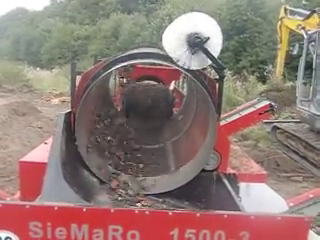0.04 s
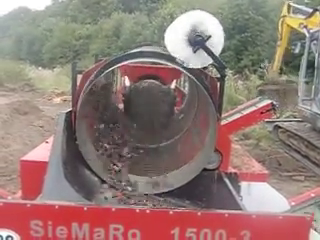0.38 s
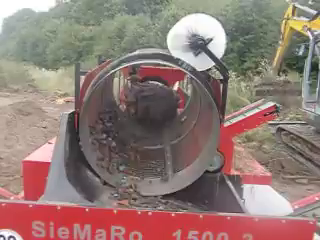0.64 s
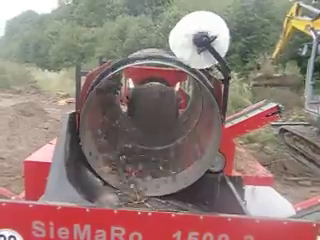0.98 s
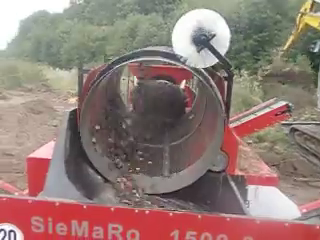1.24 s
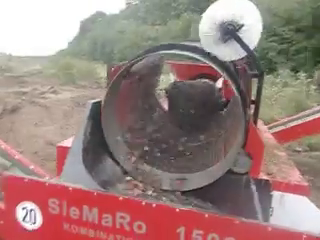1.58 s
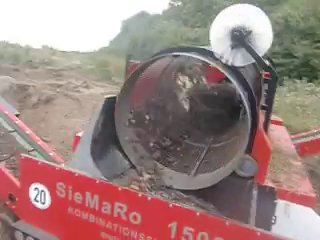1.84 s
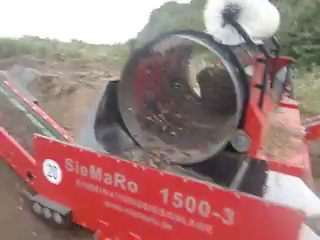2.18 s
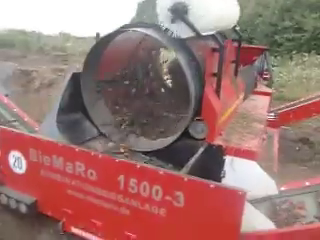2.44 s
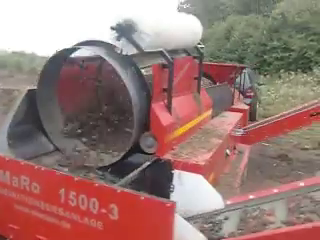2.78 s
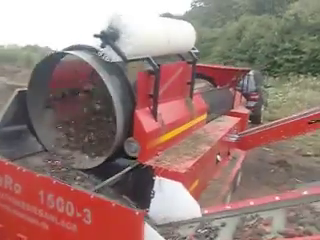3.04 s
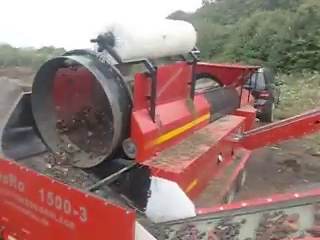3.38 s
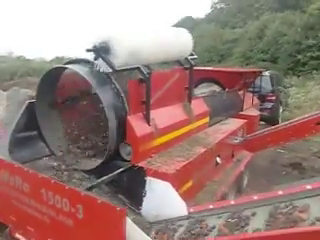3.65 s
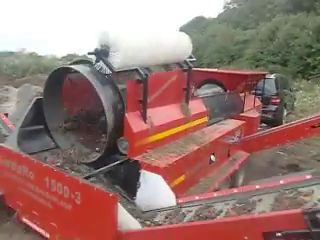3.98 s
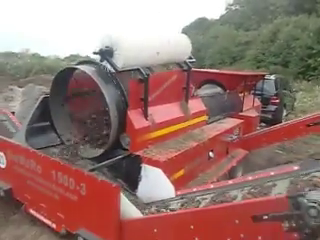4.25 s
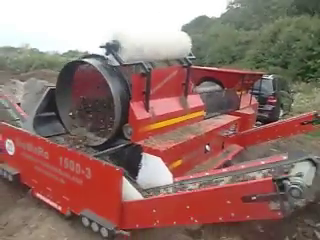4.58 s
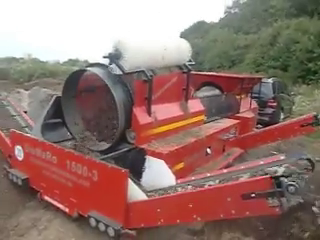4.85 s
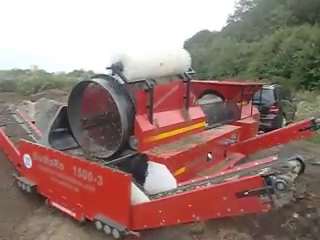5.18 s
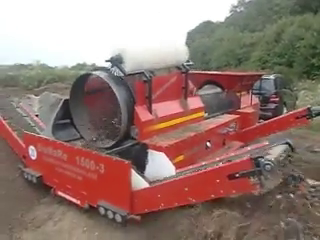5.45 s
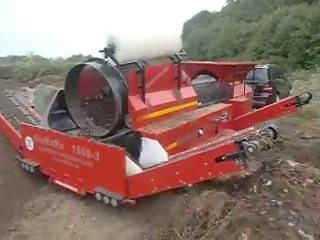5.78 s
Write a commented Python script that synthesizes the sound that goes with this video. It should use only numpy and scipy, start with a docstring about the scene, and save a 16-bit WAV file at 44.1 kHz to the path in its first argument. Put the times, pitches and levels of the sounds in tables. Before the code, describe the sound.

A screening machine runs outdoors with a steady engine drone, a rough rumble and a faint whine. Close to its turning steel drum, broken brick and concrete slide in regular surges, stones clicking together and ringing briefly on the shell. After about two seconds the tone shifts as the microphone moves to the side, and three heavy thumps follow while the drone grows fainter. The sound is narrow and compressed.

```python
"""A trommel screen sieves broken brick and concrete outdoors. At first the listener stands at the drum's
mouth, where the engine drones and the turning drum lifts rubble that slides back in surges: stones click
together and excite the modes of the steel shell. Near 2 s the listener walks round to the side and the
timbre shifts; then heavy blocks thump the frame three times as the drone grows fainter. Throughout, a
narrow-band recorder's gain control ducks the drone under each slide, and the hardest knocks overload it."""
import sys
import numpy as np
from scipy import signal
from scipy.fft import rfft, irfft
from scipy.io import wavfile

SR = 44100
rng = np.random.default_rng(int(sys.argv[2]) if len(sys.argv) > 2 else 0)


def dump(signal):
    """Clip the signal to [-1, 1] and save it as 16-bit WAV at the path in sys.argv[1]."""
    limited = np.clip(np.atleast_2d(signal).T, -1, 1)
    pcm = np.round(limited * 32767).astype(np.int16)
    wavfile.write(sys.argv[1], SR, pcm)


N = 265041
TIME = np.arange(N) / SR

# the listener's path: (time [s], share of the way from mouth to side [0-1])
WALK_PATH = [(0, 0.09), (1.7, 0.13), (2.5, 0.85), (3.8, 1), (6.01, 1)]
# rumble spectrum: (frequency [Hz], relative density at the mouth [dB], at the side [dB])
RUMBLE_SPECTRUM = [(20, -15, -9), (40, -10, -16.5), (60, -6, -4.5), (108, 1.5, -5.5), (169, 0, 1),
                   (257, 0.5, 0), (360, -1.3, -3.5), (480, -0.8, -1.3), (596, -1, -.5), (800, -3, -3),
                   (1200, -5.5, -3), (2500, -7, -10.5), (4720, -12.5, -6), (5980, -40.5, -37)]
# drone along the walk: (time [s], engine level [dB], drum drive level [dB], pump level [dB])
DRONE_LEVELS = [(0, -20, -33, -32.5), (1.2, -20.5, -34, -27.5), (1.9, -21, -32.5, -28.5),
                (2.5, -24, -35.5, -34), (3.7, -28, -36.5, -37), (4.7, -25, -31, -37.7),
                (6, -28.5, -33, -42.5)]
# machine speeds: (time [s], engine firing rate [Hz], hydraulic pump frequency [Hz])
SHAFT_SPEEDS = [(0, 92.35, 417.4), (1.2, 91.4, 407.6), (2.1, 91.3, 415), (2.6, 93.2, 417.3),
                (4.8, 92.4, 414.4), (5.2, 92.4, 411.3), (6.01, 91.5, 410)]
# engine partials: (order [multiple of the firing rate], relative level [dB])
ENGINE_ORDERS = [(.25, -37), (.5, -35.5), (1, 2.5), (1.75, -19.5), (2, -25.5), (2.25, -22), (2.5, -22.5),
                 (3, -28)]
# drum drive harmonics: (order [multiple of DRIVE_HZ], relative level [dB])
DRIVE_ORDERS = [(1, 0), (2, -5), (3, -11)]
# heavy blocks striking the frame: (time [s], level [dB])
FRAME_THUDS = [(2.33, -24), (3.374, -16), (5.33, -23.5)]
# steel shell modes: (frequency [Hz], t60 [s], relative level at the mouth [dB], at the side [dB])
SHELL_MODES = [(657, 0.034, -7, -13.5), (925, 0.037, -21, -10.5), (1055, 0.056, -14, -5),
               (1165, 0.025, -5.5, -6.5), (1438, 0.035, -19, -7.5), (1545, 0.069, -8, -3),
               (1664, 0.029, 0, 1), (1890, 0.033, -6.5, -4.5), (2082, 0.054, 3, -5), (2192, 0.016, 0, -8.5),
               (2430, 0.012, -11, -23.5), (2974, 0.054, -1, -9)]
# large lumps landing: (time [s], relative clack level [dB], lump frequency [Hz],
# relative level of the blow on the shell [dB], chatter duration [s])
LUMP_LANDINGS = [(0.0922, 10, 3460, 15, 0.006), (0.281, 9.0, 4570, 4, 0.0097),
                 (0.3107, 15.5, 4360, 8.5, 0.006), (0.3394, 6.5, 3070, 6, 0.0047),
                 (0.378, 15.5, 4490, 0, 0.0028), (0.4237, 11, 4200, 1.5, 0.003),
                 (0.659, 7, 3180, 3.5, 0.008), (0.8624, 4, 4100, 9.5, 0.015), (0.9413, 11, 2920, 0, 0.0062),
                 (0.98, 9, 3040, 12.5, 0.0063), (1.4082, 14, 4300, 4, 0.004), (1.4326, 12, 4260, 7, 0.0041),
                 (1.516, 10.5, 4100, 6, 0.008), (1.5904, 12.5, 4090, 10, 0.017),
                 (1.879, 10, 5000, 4, 0.0058), (1.9634, 2.5, 4500, 1.5, 0.012),
                 (2.0605, 13.5, 3280, 10, 0.006), (2.106, 16, 3300, 6, 0.0044),
                 (2.137, 13.5, 3140, 10, 0.004), (2.21, 12, 3460, 1, 0.0067),
                 (2.3444, 11.5, 3040, 9, 0.015), (2.4877, 15.5, 4110, 6.5, 0.0035),
                 (2.6314, 6.5, 4000, 1, 0.0028), (2.662, 15, 4120, 0.5, 0.0026),
                 (2.688, 13, 3450, -3, 0.0087), (2.715, 9, 4320, -1, 0.0049), (2.879, 4, 4050, 4.5, 0.0084),
                 (3.038, 14, 3540, -1, 0.012), (3.0564, 12.0, 4290, -3, 0.0045),
                 (3.1524, 6, 4470, 0, 0.013), (3.173, 13, 3730, 0.5, 0.013), (3.208, 17, 4580, 14, 0.011),
                 (3.44, 5, 3980, 8, 0.003), (3.576, 9.5, 4440, 4, 0.004), (3.6246, 16, 4050, 6, 0.006),
                 (3.6775, 14, 4140, 6, 0.0065), (3.7554, 11.5, 4400, 1, 0.0063),
                 (3.7803, 14, 4130, 5, 0.006), (3.8114, 20, 3590, 14, 0.026), (4.124, 11, 3750, 6.5, 0.005),
                 (4.2048, 8, 3850, -1, 0.011), (4.3226, 17.5, 3900, 10, 0.0044),
                 (4.4136, 13, 3810, 9.5, 0.005), (4.797, 11.5, 3980, 5, 0.0053),
                 (4.8314, 14.5, 4180, 13.5, 0.003), (4.8838, 10.5, 3120, -8, 0.012),
                 (4.9297, 8.5, 3780, 9.5, 0.0089), (4.9886, 16, 4480, 9.5, 0.015),
                 (5.176, 10.5, 4050, 7, 0.018), (5.3624, 5, 3420, 17, 0.0093),
                 (5.4605, 13.5, 3840, 1, 0.003), (5.5116, 18.5, 3290, 0, 0.012),
                 (5.55, 6.5, 4010, 11, 0.0049), (5.976, 15.0, 3850, 10, 0.0084)]
# colour of the clatter: (frequency [Hz], relative gain at the mouth [dB], at the side [dB])
CLATTER_SPECTRUM = [(300, -20, -25.5), (900, -23, -12.5), (1800, -14.5, -4), (2700, -3, -8),
                    (3090, -1.5, -2.5), (3600, -5, 1.5), (4220, 1, 3), (4500, 1, 0), (5010, -3, -3),
                    (5600, -12, -11.5), (6600, -15.5, -16.5)]
# slides of the load, about 0.57 s apart: (start [s], duration [s], clatter level [dB], steel level [dB])
LOAD_SLIDES = [(0.206, 0.21, -14.5, -18.8), (0.704, 0.3, -13.6, -19), (1.203, 0.35, -14, -21.5),
               (1.799, 0.346, -16.5, -20), (2.195, 0.552, -17, -21), (2.864, 0.43, -17, -19.5),
               (3.345, 0.54, -17, -20), (4.086, 0.342, -18, -22.5), (4.63, 0.361, -17, -22),
               (5.25, 0.31, -17.5, -18), (5.8, .33, -20, -29)]

DRIVE_HZ = 70.1
RUMBLE_DB = (-19.8, -22)  # mouth, side
ROLLING_CLATTER_DB, ROLLING_STEEL_DB = (-19.5, -22), (-21, -24)  # mouth, side
THUD_BAND_HZ, THUD_ATTACK_S, THUD_T60_S = (200, 1600), 0.0045, .45
SLIDE_BUILD_S, CLATTER_SETTLE_S, STEEL_SETTLE_S = .17, .045, 0.075
AGC_THRESHOLD_DB, AGC_RATIO = -19.5, 2.19
AGC_ATTACK_S, AGC_GLIDE_S, AGC_RECOVERY_DB_PER_S = 0.028, 0.035, 27.5
MIC_EDGE_HZ, OUTPUT_EDGE_HZ = 5920, 15800


def gain_of(db):
    """The decibel scale: 20 dB is a factor of ten in amplitude."""
    return 10 ** (np.asarray(db) / 20)


def unit_rms(x):
    """Normalisation to unit mean power."""
    return x / np.sqrt(np.mean(x ** 2) + 1e-20)


def curves(rows):
    """Linear interpolation of each column of a time table at every sample."""
    times, *columns = np.transpose(rows)
    return [np.interp(TIME, times, column) for column in columns]


def wander(rate_hz):
    """Random modulation: noise of unit rms, low-passed at the given rate."""
    f = np.fft.rfftfreq(N, 1 / SR)
    return unit_rms(irfft(rfft(rng.standard_normal(N)) / (1 + (f / rate_hz) ** 4), N))


def add(mix, start_s, sound):
    """Superposition of a sound on the mix from a given time."""
    part = mix[max(round(start_s * SR), 0):][:len(sound)]
    part += sound[:len(part)]


def walked(mouth, side):
    """Directivity: the sound at the mouth crossfades to that at the side along the walk."""
    share = np.clip(curves(WALK_PATH)[0], 0, 1)
    return (1 - share) * mouth + share * side


def coloured(x, spectrum):
    """Spectral shaping: mouth and side filters give signals of equal power, blended along the walk."""
    hz, *views_db = np.transpose(spectrum)
    log_f = np.log(np.fft.rfftfreq(N, 1 / SR) + 1)
    responses = [gain_of(np.interp(log_f, np.log(hz), db)) for db in views_db]
    return walked(*[unit_rms(irfft(rfft(x) * response, N)) for response in responses])


def rumble():
    """Broadband noise: fan, belts and shaking frame make a slightly uneven roar."""
    roar = coloured(rng.standard_normal(N), RUMBLE_SPECTRUM)
    return roar * gain_of(walked(*RUMBLE_DB) + .5 * wander(6.9))


def hum(hz, orders, shake):
    """Shaft orders: partials at fixed multiples of one rate, each fluctuating in amplitude."""
    turns = np.cumsum(hz) / SR
    sound = np.zeros(N)
    for order, db in orders:
        amplitude = gain_of(db) * (1 + shake * wander(11))
        sound += amplitude * np.sin(2 * np.pi * (order * turns + rng.random()))
    return unit_rms(sound)


def machine():
    """Periodic forcing: engine and drum drive beat together under the hydraulic pump's whine."""
    engine_db, drive_db, pump_db = curves(DRONE_LEVELS)
    firing_hz, pump_hz = curves(SHAFT_SPEEDS)
    engine = gain_of(engine_db) * hum(firing_hz, ENGINE_ORDERS, shake=0.1)
    drive = gain_of(drive_db) * hum(DRIVE_HZ * (1 + 0.0043 * wander(2.6)), DRIVE_ORDERS, shake=0.1)
    pump = gain_of(pump_db) * hum(pump_hz * (1 + 0.0027 * wander(13.0)), [(1, 0)], shake=0.38)
    return engine + drive + pump


def thuds():
    """Modal overlap: a heavy block excites so many low frame modes that they decay as a band of noise."""
    t = np.arange(SR // 2) / SR
    band = signal.butter(2, THUD_BAND_HZ, "bandpass", fs=SR, output="sos")
    envelope = np.minimum(t / THUD_ATTACK_S, 1) * gain_of(-60 * t / THUD_T60_S)
    sound = np.zeros(N)
    for start_s, db in FRAME_THUDS:
        vibration = unit_rms(signal.sosfilt(band, rng.standard_normal(len(t))))
        add(sound, start_s, gain_of(db) * envelope * vibration)
    return sound


def shell(blows, panels=4):
    """Modal resonance: each blow rings one of the drum's steel panels, all tuned slightly apart."""
    t = np.arange(4000) / SR
    hz, t60, mouth_db, side_db = np.transpose(SHELL_MODES)[:, :, None]
    struck_panel = rng.integers(0, panels, N)
    sound = np.zeros(N)
    for panel, detune in enumerate(np.linspace(-0.005, 0.005, panels)):
        modes = np.sin(2 * np.pi * (hz * (1 + detune) * t + rng.random(hz.shape)))
        modes *= gain_of(-60 * t / t60) / np.sqrt(t60)  # equal energy before weighting
        rings = [(gain_of(db) * modes).sum(0) for db in (mouth_db, side_db)]
        force = blows * (struck_panel == panel)
        sound += walked(*[signal.oaconvolve(force, ring / np.linalg.norm(ring))[:N] for ring in rings])
    return sound


def in_drum(x, wet_db, t60):
    """Reverberation: sparse, quick reflections in the drum, different for each landing place."""
    t = np.arange(6000) / SR
    arrivals = (rng.random(len(t)) < .08) * (t > .0015)
    taps = rng.standard_normal(len(t)) * arrivals * gain_of(-60 * t / t60)
    taps *= gain_of(wet_db) / np.linalg.norm(taps)
    taps[0] = 1  # direct sound
    return signal.fftconvolve(x, taps)


def stone(hz, t60, crack_db, overtone_db):
    """Impulse response of a stone: a brief crack and five damped, inharmonic modes."""
    t = np.arange(3000) / SR
    other_hz = hz * rng.uniform(0.707, 1.35, (4, 1))
    other_modes = np.sin(2 * np.pi * other_hz * t).sum(0)
    ring = np.sin(2 * np.pi * hz * t) + gain_of(overtone_db) * other_modes
    crack = rng.standard_normal(len(t)) * np.exp(-t / 0.0013)
    return ring * gain_of(-60 * t / t60) + gain_of(crack_db) * crack


def chatter(length_s, per_s):
    """Repeated contact: a rough lump lands hard, then rattles briefly on its corners."""
    t = np.arange(1500) / SR
    contacts = 0.48 * rng.standard_normal(len(t)) * (rng.random(len(t)) < per_s / SR)
    contacts *= np.exp(-(t / length_s) ** 4)
    contacts[0] = 1
    return contacts


def lumps():
    """Impact excites both bodies: each large lump clacks and sets the shell ringing."""
    clacks, blows = np.zeros(N), np.zeros(N)
    stone_band = signal.butter(5, [2300, 4950], "bandpass", fs=SR, output="sos")
    for start_s, clack_db, hz, blow_db, chatter_s in LUMP_LANDINGS:
        response = stone(hz, t60=0.013, crack_db=8.5, overtone_db=-7)
        rattle = signal.fftconvolve(response, chatter(chatter_s, per_s=2000))
        clack = signal.sosfilt(stone_band, in_drum(rattle, wet_db=-1.5, t60=0.089))
        add(clacks, start_s, gain_of(clack_db) * clack / np.linalg.norm(clack))
        add(blows, start_s, gain_of([blow_db]))
    return gain_of(3.0) * clacks + gain_of(0.5) * shell(blows)


def impacts(per_s, spread_db):
    """A Poisson process: independent collisions, many small and a few large."""
    size = gain_of(spread_db * np.minimum(rng.exponential(1, N), 4))
    return size * rng.choice([-1, 1], N) * (rng.random(N) < per_s / SR)


def sliding():
    """Incoherent sources add in power: clatter and steel envelopes of slides over steady rolling."""
    clatter_power = gain_of(walked(*ROLLING_CLATTER_DB)) ** 2
    steel_power = gain_of(walked(*ROLLING_STEEL_DB)) ** 2
    for start_s, length_s, clatter_db, steel_db in LOAD_SLIDES:
        flow = np.clip((TIME - start_s) / SLIDE_BUILD_S, 0, 1)
        since_end = TIME - start_s - length_s
        clatter_power += (gain_of(clatter_db) * flow * np.clip(1 - since_end / CLATTER_SETTLE_S, 0, 1)) ** 2
        steel_power += (gain_of(steel_db) * flow * np.clip(1 - since_end / STEEL_SETTLE_S, 0, 1)) ** 2
    return np.sqrt(clatter_power), np.sqrt(steel_power)


def rubble(sizes=40):
    """Granular flow: stones of many sizes tumble in clumps, striking each other and the shell."""
    clatter_gain, steel_gain = sliding()
    clumps = wander(16)
    clicks = np.zeros(N)
    for hz in np.linspace(2000, 5600, sizes):
        response = stone(hz, t60=0.013, crack_db=4, overtone_db=-7.5)
        click = in_drum(response, wet_db=-2.5, t60=0.052)
        clicks += signal.oaconvolve(impacts(per_s=38, spread_db=2.5), click / np.linalg.norm(click))[:N]
    clatter = clatter_gain * coloured(clicks, CLATTER_SPECTRUM)
    steel = steel_gain * unit_rms(shell(impacts(per_s=2000, spread_db=1.5)))
    return clatter * gain_of(0.99 * clumps) + steel * gain_of(1.6 * clumps)


def scene():
    """Superposition of the machine and its load in one channel."""
    return (rumble() + machine() + thuds() + lumps() + rubble())[None]


def smoothed(x, seconds):
    """Exponential averaging with the given time constant, starting from the overall mean."""
    keep = np.exp(-1 / (seconds * SR))
    return x.mean() + signal.lfilter([1 - keep], [1, -keep], x - x.mean())


def gain_control(x):
    """Dynamic compression: the gain falls while the rubble is loud and recovers in each lull."""
    level_db = 10 * np.log10(smoothed(x[0] ** 2, AGC_ATTACK_S) + 1e-12)
    recovery_db = AGC_RECOVERY_DB_PER_S * TIME
    held_db = np.maximum.accumulate(level_db + recovery_db) - recovery_db  # decaying peak hold
    cut_db = np.maximum(held_db - AGC_THRESHOLD_DB, 0) * (1 - 1 / AGC_RATIO)
    return x * gain_of(-smoothed(cut_db, AGC_GLIDE_S))


def low_pass(x, hz, taps):
    """Band limiting by a steep, linear-phase filter."""
    kernel = signal.firwin(taps, hz, window=("kaiser", 9), fs=SR)
    return signal.oaconvolve(x, kernel[None], "same")


def record(dry):
    """Saturation: after gain control, the hardest knocks clip before and after a narrow-band filter."""
    overloaded = np.clip(gain_control(dry), -.66, .66)
    narrow = low_pass(overloaded, MIC_EDGE_HZ, taps=201)
    clipped = np.clip(narrow, -.71, .71)
    return low_pass(clipped, OUTPUT_EDGE_HZ, taps=511)


dry = scene()
out = record(dry)
dump(out)
```